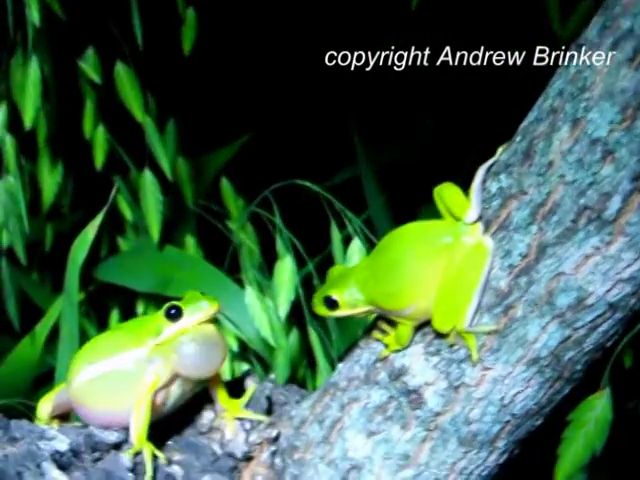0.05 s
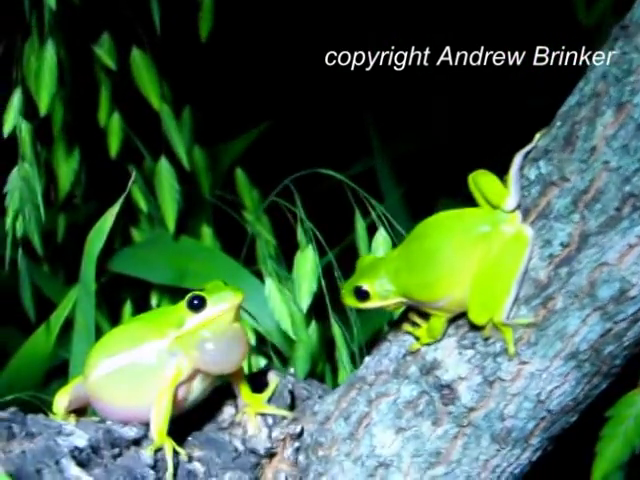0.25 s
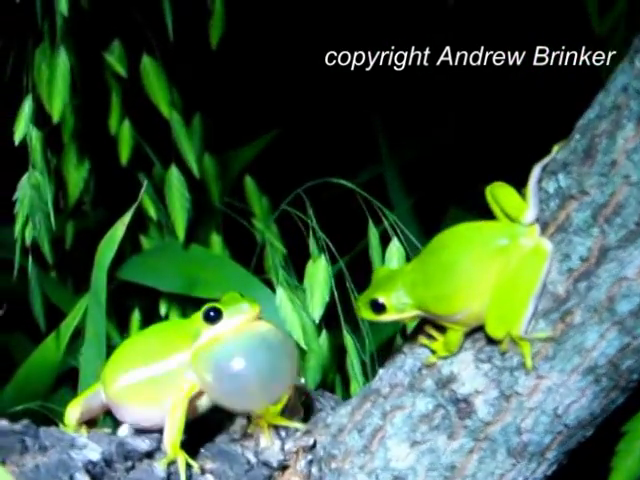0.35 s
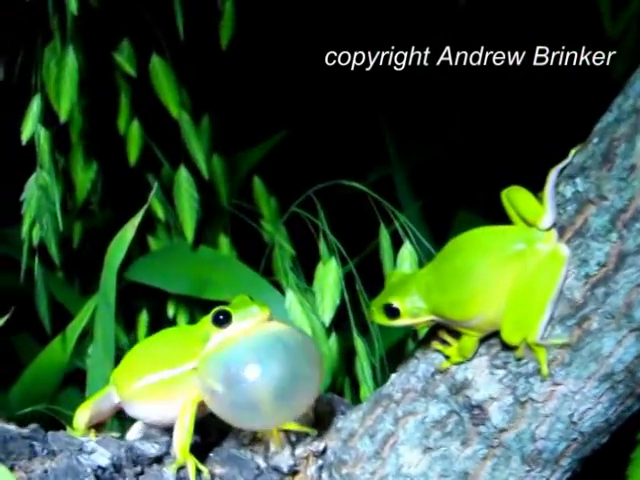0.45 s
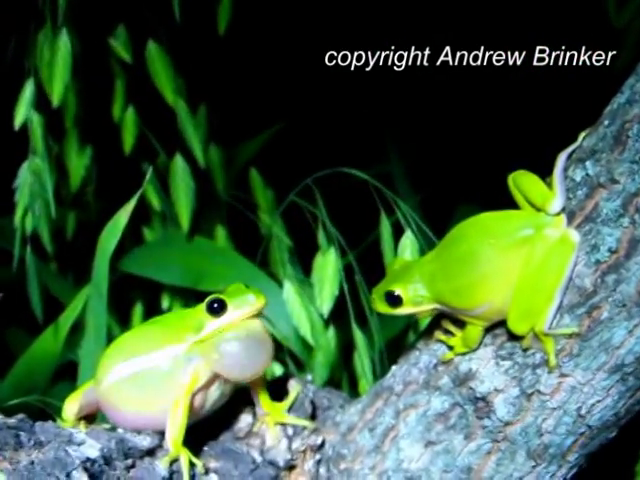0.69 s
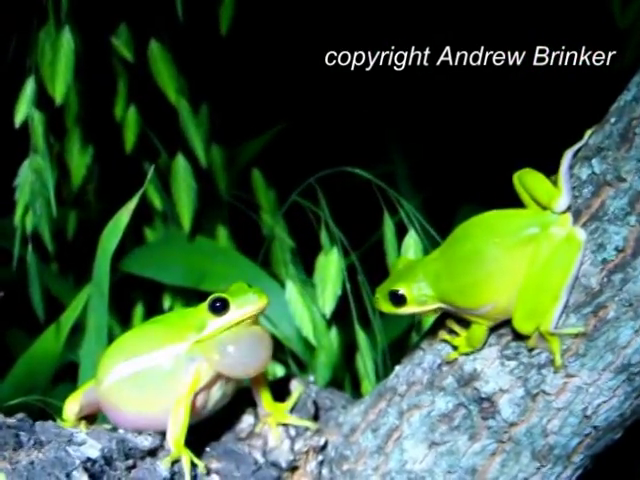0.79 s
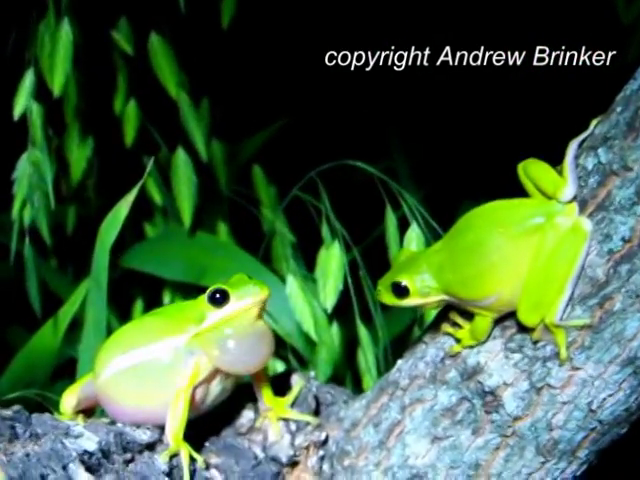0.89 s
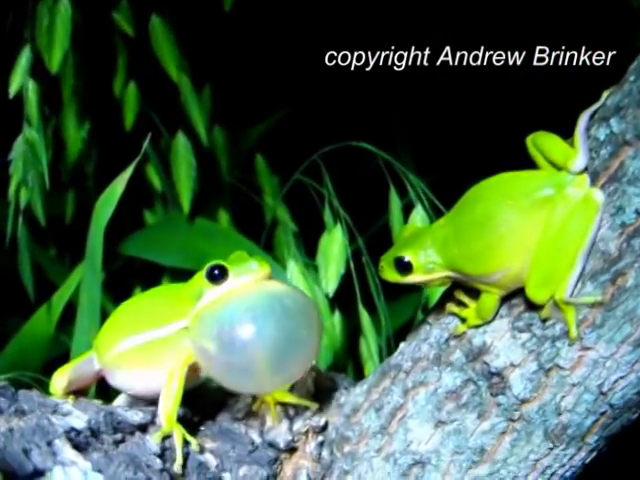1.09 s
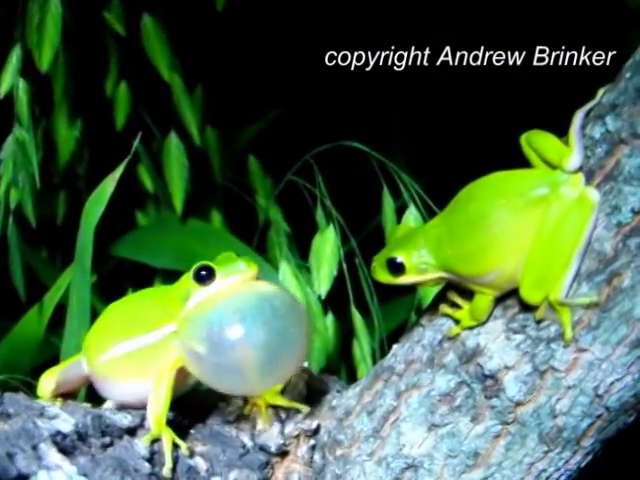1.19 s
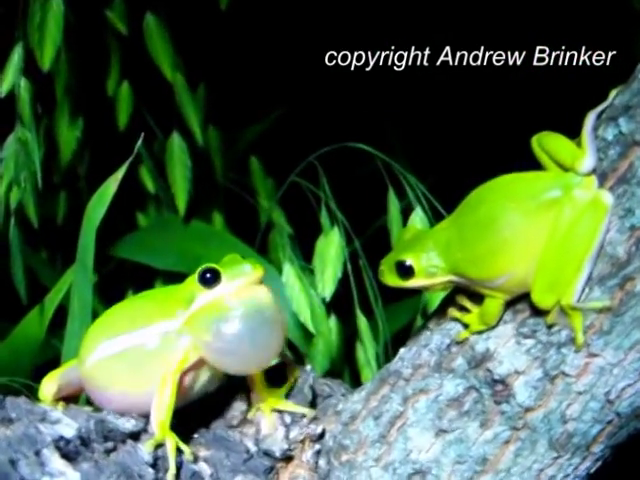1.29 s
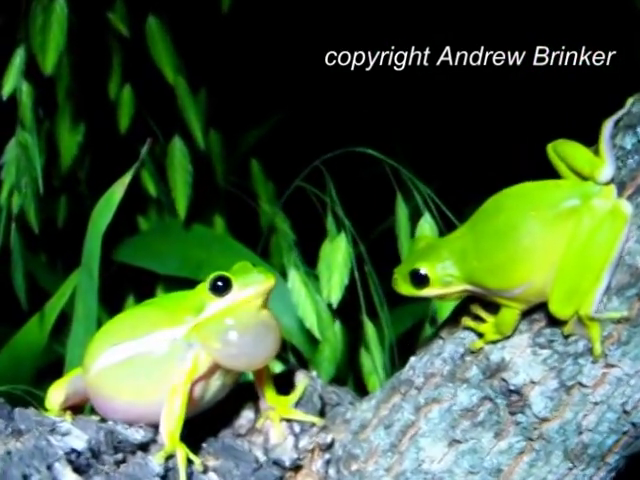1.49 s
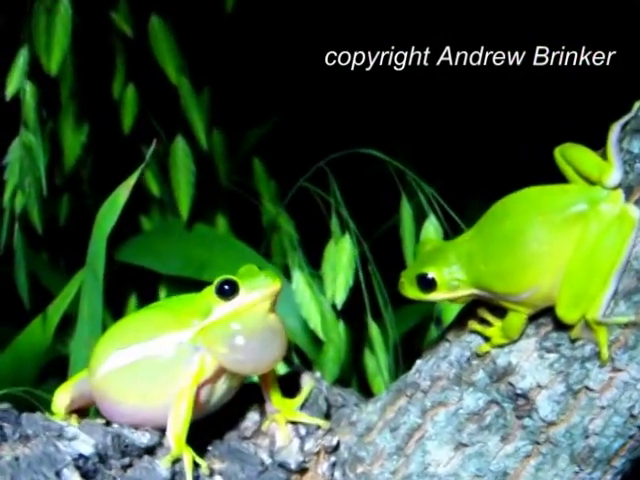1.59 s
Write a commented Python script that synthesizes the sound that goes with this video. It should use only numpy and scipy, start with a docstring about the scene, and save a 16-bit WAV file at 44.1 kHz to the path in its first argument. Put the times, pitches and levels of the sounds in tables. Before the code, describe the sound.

Two loud nasal croaks come from a tree frog on a nearby branch, short, buzzy and slightly overloading the microphone. Around and between them, neighbouring frogs answer softly over the blur of a far forest chorus.

```python
"""Two loud nasal croaks from a tree frog on a branch, close enough to overload the microphone a little.
Each is a train of larynx pulses ringing the throat and vocal sac: slow clicks, a steady buzz while
the throat resonance rises, then a stumbling end with a falling squeak.
Neighbours call from the forest behind, over the blur of a far chorus."""
import sys
import numpy as np
from scipy import signal
from scipy.fft import rfft, irfft, next_fast_len
from scipy.io import wavfile
from scipy.ndimage import uniform_filter1d

SR = 44100
rng = np.random.default_rng(int(sys.argv[2]) if len(sys.argv) > 2 else 0)


def transcribe(u):
    """Save the signal u as a 16-bit wav file named by the first command-line argument.

    u: samples, shape (n,) or (channels, n), limited to [-1, 1]; the rate is SR.
    q: integer samples, one column per channel.
    """
    v = np.clip(np.atleast_2d(u).T, -1, 1)
    q = np.round(v * 32767).astype(np.int16)
    wavfile.write(sys.argv[1], SR, q)


N = 72765
STEPS = np.linspace(0, 1, 9)  # progress through a call
NO_SNAP_DB = -120


def near_frog(gain_db=18):
    """Two close croaks, each closing with a squeak."""
    # One list per croak. Each row: time in seconds, pulse rate in Hz, level in dB,
    # throat resonance in Hz, snap in dB, roughness 0-1.
    croaks = [
        [(.2290, 114.3, -3.5, 2500, -43, 0.08), (.244, 145.6, 0.5, 2470, -29, 0.08),
         (.263, 224.6, -0.5, 2890, 1, 0), (.269, 290.7, 1, 2780, -7.5, 0.04),
         (.286, 290.9, 1.5, 2853, -2.5, 0.02), (.318, 285.8, -0.5, 2840, -3.5, 0),
         (.345, 284.9, -2, 3010, -4, 0), (.372, 280.8, -6, 2860, -7, 0.03), (.381, 234, 0.5, 3000, -33, 0.48),
         (.392, 274.8, -7, 2880, -30, 0.58), (.399, 242, -27, 2800, -40, 0.77)],
        [(.9057, 108.3, -0.5, 2280, -43, 0.3), (.915, 124.4, -0.5, 2550, -35, 0.11),
         (.929, 274.5, 2.5, 2720, -13, 0.73), (.944, 218.1, 2, 2810, -3.5, 0.3),
         (.949, 292.8, 2.5, 2790, -10, 0.05), (.96, 288.7, -2, 2810, 0, 0.01), (.991, 286, 0, 2960, -3, 0),
         (1.016, 282.7, 0, 2990, -7.5, 0), (1.038, 279.6, -5.5, 3300, -13.5, 0.03),
         (1.045, 197.2, -1, 2980, -39, 0.37), (1.074, 153, -9, 2750, -72, 0.78),
         (1.088, 156, -24, 2710, -70, 0.75)],
    ]
    # Body and vocal sac response. Each row: frequency in Hz, gain in dB.
    sac = [(300, -72), (580, -42), (760, -13), (860, 3), (950, -5), (1150, -8), (1430, -15), (1720, -10),
           (2010, -9), (2300, -9), (2580, -11), (2850, -7.5), (3160, -8), (3450, -15), (3700, -25),
           (4000, -21), (4600, -45), (7000, -55), (12000, -76)]
    # Each row: start in seconds, length in seconds, first pitch in Hz, level in dB.
    squeaks = [(.393, 0.0336, 945, -23.5), (1.066, 0.022, 895, -22)]
    # Each row: frequency in Hz, left minus right in dB.
    pan = [(860, -0.8), (2000, 0), (2900, -2.5), (4000, -0.5)]
    voice = sum(larynx_pulses(rows, sac, width_hz=352) for rows in croaks)
    voice += sum(squeak(*row) for row in squeaks)
    return panned(forest(amp(gain_db) * voice, wet_db=-6), pan)


def larynx_pulses(rows, colour, width_hz, size=2048):
    """Pulses at a changing rate; each rings the sac and the moving throat resonance, and may snap."""
    # Sharp snap in each pulse of the full buzz. Each row: frequency in Hz, gain in dB.
    snap_colour = [(40, -35), (150, 1), (290, -7.5), (570, -10.5), (900, -21), (1430, -15), (3000, -12.5),
                   (4100, -18), (5000, -14), (5750, -12), (6400, -18), (7300, -26.5), (8000, -29.5),
                   (9000, -20), (10200, -29), (12500, -24.5), (14000, -67.5)]
    snap_gain_db, snap_delay_s, flutter_db = 1, 0.000486, 1.15
    jitter_s, shimmer_db, scatter_hz, damping = 0.000554, 4.5, 90, 1.65  # at full roughness
    times_s, rate_hz, *controls = np.transpose(rows)
    t = np.arange(times_s[0], times_s[-1], 1 / SR)
    cycles = np.cumsum(np.interp(t, times_s, rate_hz)) / SR
    pulse_s = np.interp(np.arange(cycles[-1]), cycles, t)
    db, throat_hz, snap_db, rough = (np.interp(pulse_s, times_s, c) for c in controls)
    late, louder, higher, flutter = rng.standard_normal((size, 4))[:len(pulse_s)].T
    onset = np.maximum(pulse_s + jitter_s * rough * late, 0) * SR
    hz = np.fft.rfftfreq(size, 1 / SR)
    centre_hz = (throat_hz + scatter_hz * rough * higher)[:, None]
    damped_hz = width_hz * (1 + damping * rough[:, None])
    ring = minimum_phase(colour, size) * centre_hz ** 2 / (centre_hz ** 2 - hz ** 2 + 1j * hz * damped_hz)
    snap = -minimum_phase(snap_colour, size) * np.exp(-2j * np.pi * hz * snap_delay_s)
    snap = snap * amp(snap_db + snap_gain_db)[:, None]
    subsample_delay = np.exp(-2j * np.pi * hz / SR * (onset % 1)[:, None])
    pulses = irfft((ring + snap) * subsample_delay)
    pulses *= amp(db + shimmer_db * rough * louder + flutter_db * flutter)[:, None]
    index = onset.astype(int)[:, None] + np.arange(size)
    return np.bincount(index.ravel(), pulses.ravel(), N)[:N]


def squeak(start_s, length_s, pitch_hz, db, fall=0.248, fade_db=14, throat_hz=2310):
    """The larynx closes: fast soft pulses that fall in pitch and fade."""
    # Thin voice of the squeak. Each row: frequency in Hz, gain in dB.
    colour = [(300, -67), (600, -32), (760, -4.5), (930, 4.5), (1200, -14), (1550, 4.5), (1900, -3.5),
              (2500, -18), (3200, -6), (3900, -1), (7000, -38)]
    rows = [(start_s + length_s * u, pitch_hz * (1 - fall * u * u), db - fade_db * u * u,
             throat_hz, NO_SNAP_DB, 0) for u in STEPS]
    return larynx_pulses(rows, colour, width_hz=1800)


def neighbours(gain_db=-5.5, sag=0.0328, rise_hz=300, edge_db=22.5, edge_rough=0.35):
    """Each call grows and fades, rougher at both ends; its pitch sags, its throat resonance rises."""
    # Each row: start in seconds, length in seconds, pulse rate in Hz, level in dB,
    # throat resonance in Hz, roughness 0-1, forest scatter in dB, extra low honk in dB.
    calls = [(.06, 0.21, 272, -3, 2800, 0.06, -2.5, -3.5), (.465, .15, 268.9, 0, 3070, 0.01, -5.5, -1.5),
             (.63, .17, 266, -5.5, 2970, 0.07, -15, 7), (.81, 0.21, 280, 1, 2680, 0.09, -7.5, -2.5),
             (1.085, 0.14, 272.4, -1.5, 2980, 0.05, -12, -1),
             (1.29, 0.131, 283.2, 1.5, 2880, 0.04, -19, 6.5),
             (1.39, 0.11, 275, -2.5, 3080, 0.17, -5.5, 3.5), (1.56, 0.23, 282, -4, 2630, 0, -7, 3)]
    # A neighbour's sac heard through foliage. Each row: frequency in Hz, gain in dB.
    far_sac = [(300, -56), (580, -35.5), (720, -13), (810, 7), (860, 8.5), (980, -14.5), (1150, 2),
               (1700, -15.5), (2250, -7.5), (2800, -4), (3400, -15.5), (4000, -0.5), (4800, -15.5),
               (7000, -7), (7700, -43), (9500, -15.5), (13000, -40)]
    honk_below_hz = 1060
    out = np.zeros((2, N))
    u = STEPS - 0.5
    ends = (2 * u) ** 4
    for start_s, length_s, rate_hz, db, throat_hz, rough, wet_db, honk_db in calls:
        colour = [(hz, level + honk_db * (hz < honk_below_hz)) for hz, level in far_sac]
        rows = np.transpose([start_s + length_s * STEPS, rate_hz * (1 - sag * u), db - edge_db * ends,
                             throat_hz + rise_hz * u, np.full_like(u, NO_SNAP_DB),
                             rough + edge_rough * ends])
        out += forest(larynx_pulses(rows, colour, width_hz=370), wet_db)
    return amp(gain_db) * out


def chorus(patchy_db=4.0, gain_db=-1):
    """Many far frogs blur into a patchy wash of noise in their voice bands."""
    # Each row: frequency in Hz, spectral density in dB.
    spectrum = [(40, -56), (115, -22), (200, -40.5), (450, -30.5), (600, -41.5), (700, -13.5), (790, 1.5),
                (950, -8.5), (1300, -11), (1750, -21), (2250, -8), (2750, -3), (3350, -14.5), (4000, -5),
                (4500, -21), (5100, -25.5), (6700, -26.5), (7600, -64), (10000, -48), (13000, -56)]
    # Each row: frequency in Hz, left-right correlation.
    likeness = [(700, 1), (2500, 0.88), (4000, 0.27), (8000, 0.28)]
    # The level wavers and is ducked briefly after each loud croak. Each row: time in seconds, level in dB.
    background_level = [(0, -32.5), (.13, -31), (0.222, -29.5), (.4, -34), (.45, -36), (.52, -35),
                        (.62, -32), (.72, -30), (.82, -32), (0.902, -32.5), (1.09, -34), (1.16, -35),
                        (1.262, -34.5), (1.35, -29.5), (1.45, -32), (1.51, -36.5), (1.6, -30.5),
                        (1.65, -30)]

    def mid_side_gains(hz):
        angle = np.arccos(np.clip(along(likeness, hz), -1, 1)) / 2
        return amp(along(spectrum, hz)) * [np.cos(angle), np.sin(angle)]

    bins = signal.stft(rng.standard_normal((2, N)), nperseg=1024)[2]
    patches = uniform_filter1d(rng.standard_normal(bins.shape[1:]), size=3, axis=0)
    patches = uniform_filter1d(patches, size=8, axis=1)
    wash = signal.istft(bins * amp(patchy_db * unit(patches)), nperseg=1024)[1][:, :N]
    mid, side = filtered(wash, mid_side_gains)
    background_db = np.interp(np.arange(N) / SR, *np.transpose(background_level))
    return unit(np.array([mid + side, mid - side])) * amp(gain_db + background_db)


def forest(x, wet_db, side_db=-13.5):
    """Direct sound plus a short, nearly central scatter from leaves and trunks."""
    # Each row: frequency in Hz, time to decay 60 dB in seconds.
    t60 = [(200, 0.05), (900, 0.084), (3000, 0.099), (10000, 0.059)]
    hz, t, bins = signal.stft(rng.standard_normal((2, SR // 2)), SR, nperseg=256)
    tail = signal.istft(bins * amp(-60 * t / along(t60, hz)[:, None]), SR, nperseg=256)[1]
    mid, side = signal.fftconvolve(x[None], tail / np.linalg.norm(tail[0]), axes=1)[:, :N]
    return x + amp(wet_db) * (mid + np.outer([1, -1], amp(side_db) * side))


def amp(db):
    """Decibels to gain."""
    return 10 ** (np.asarray(db) / 20)


def unit(x):
    """x at rms 1."""
    return x / np.sqrt(np.mean(x ** 2) + 1e-20)


def along(points, hz):
    """Interpolate (Hz, value) points on a log axis."""
    knots_hz, values = np.transpose(points)
    return np.interp(np.log(hz + 1), np.log(knots_hz + 1), values)


def filtered(x, response):
    """x through a complex frequency response."""
    size = next_fast_len(N + SR // 2)
    return irfft(rfft(x, size) * response(np.fft.rfftfreq(size, 1 / SR)), size)[..., :N]


def minimum_phase(colour, size):
    """Causal response through (Hz, dB) points."""
    cepstrum = irfft(np.log(amp(along(colour, np.fft.rfftfreq(size, 1 / SR)))))
    cepstrum[1:size // 2] *= 2
    cepstrum[size // 2 + 1:] = 0
    return np.exp(rfft(cepstrum))


def panned(x, pan):
    """Level difference between the channels, by frequency."""
    return filtered(x, lambda hz: amp(np.outer([.5, -.5], along(pan, hz))))


def scene():
    """The close frog in front of the others."""
    # Each row: frequency in Hz, left minus right in dB.
    back_pan = [(800, 1), (2700, -2.5), (5000, 0)]
    return near_frog() + panned(neighbours() + chorus(), back_pan)


def record(dry, ceiling_up=0.69, ceiling_down=2.5, knee=6, bass_cut_hz=120, top_hz=13200):
    """The input stage flattens upward swings first, adding overtones; then bass cut and band limit."""
    ceiling = np.where(dry > 0, ceiling_up, ceiling_down)
    bent = dry / (1 + np.abs(dry / ceiling) ** knee) ** (1 / knee)
    return filtered(bent, lambda hz: (1j * hz / (bass_cut_hz + 1j * hz)) ** 2 / (1 + (hz / top_hz) ** 60))


dry = scene()
out = record(dry)
transcribe(out)
```